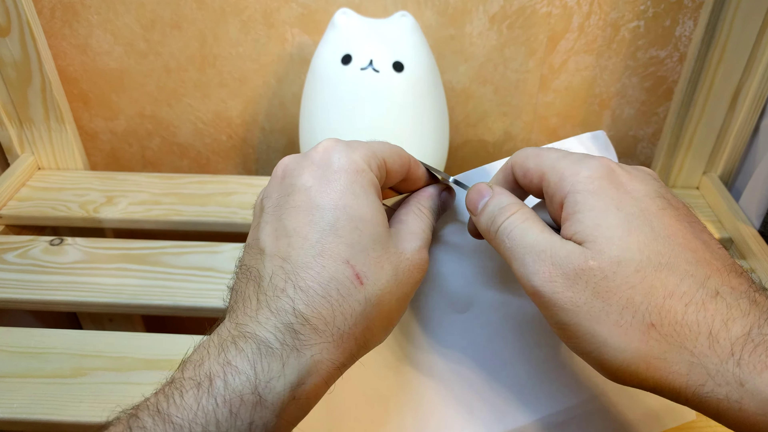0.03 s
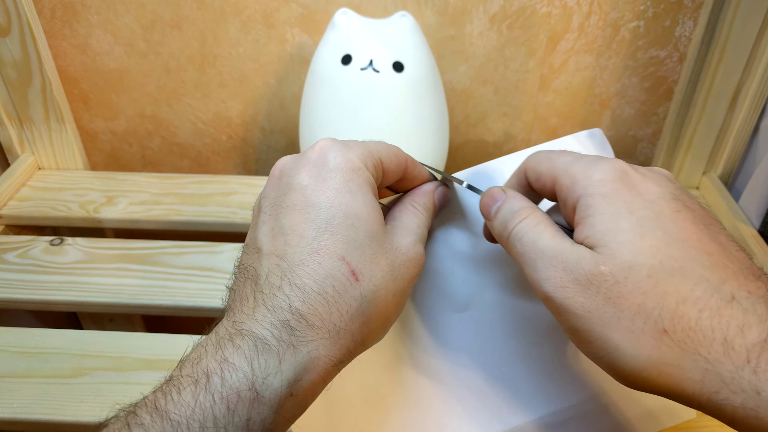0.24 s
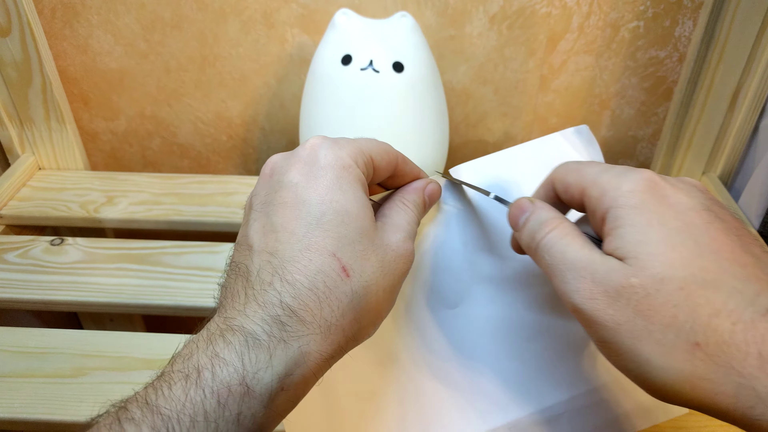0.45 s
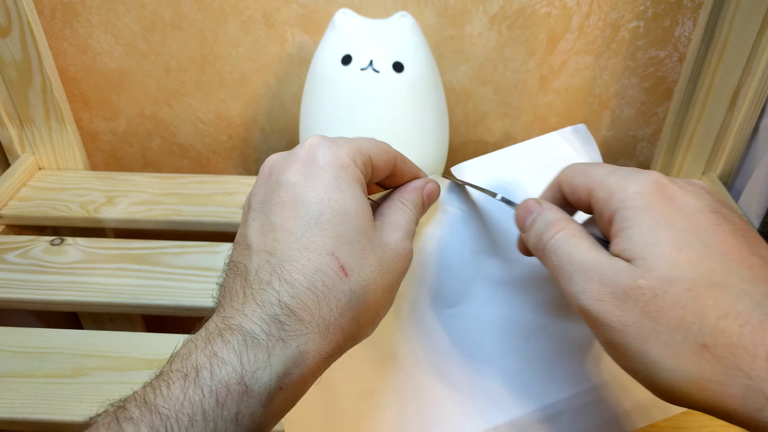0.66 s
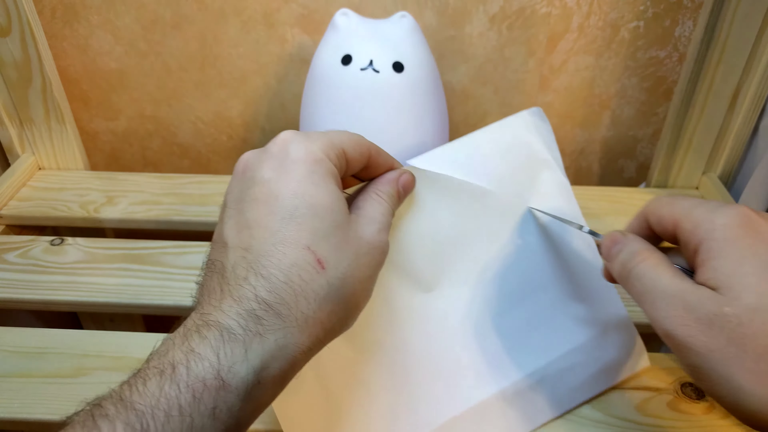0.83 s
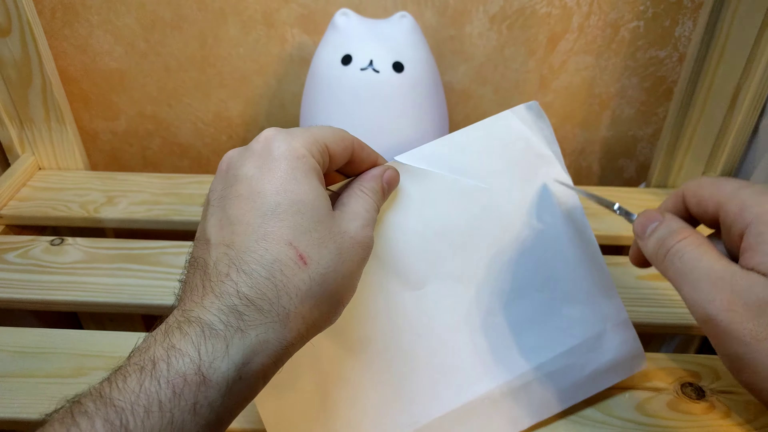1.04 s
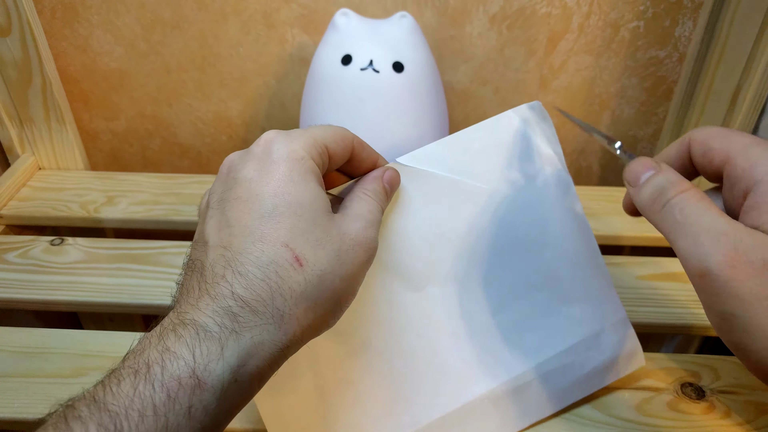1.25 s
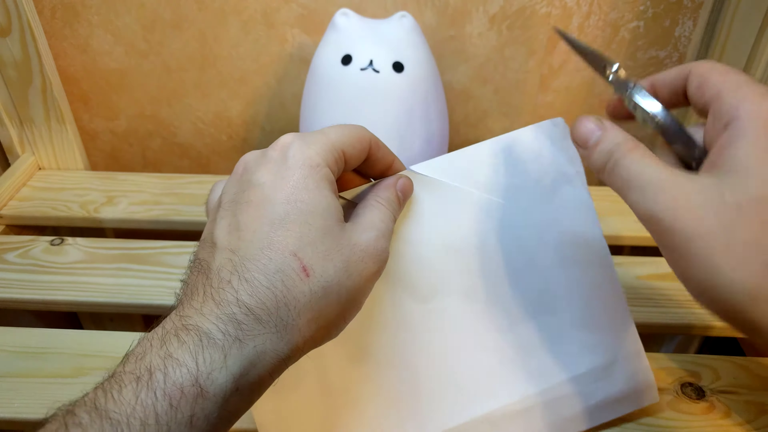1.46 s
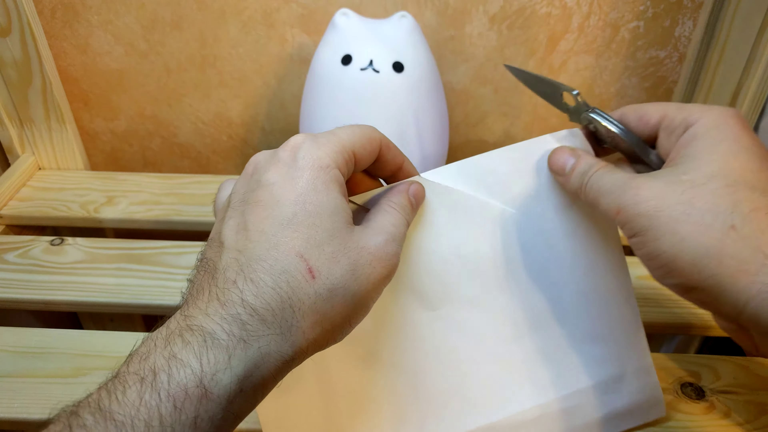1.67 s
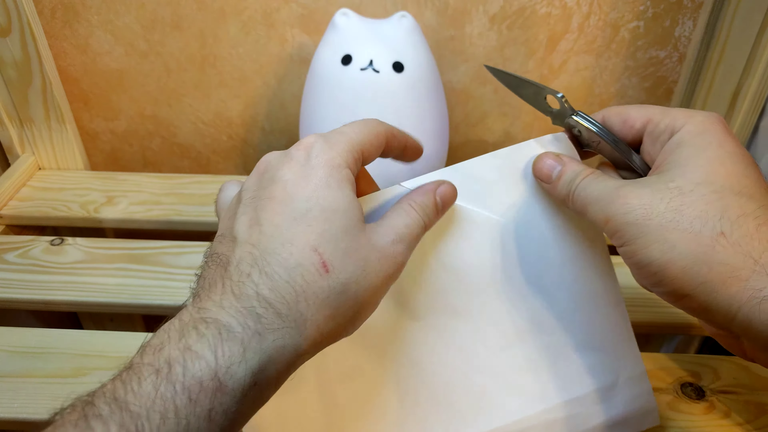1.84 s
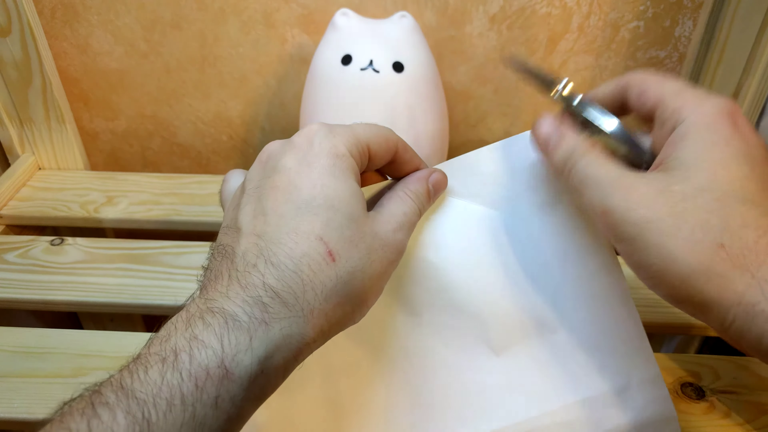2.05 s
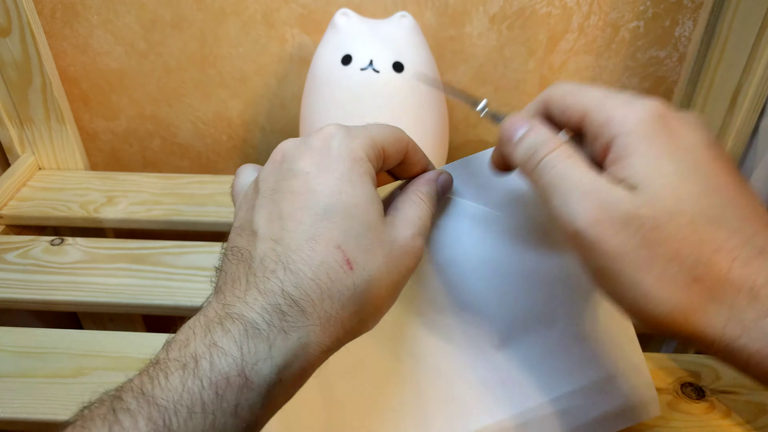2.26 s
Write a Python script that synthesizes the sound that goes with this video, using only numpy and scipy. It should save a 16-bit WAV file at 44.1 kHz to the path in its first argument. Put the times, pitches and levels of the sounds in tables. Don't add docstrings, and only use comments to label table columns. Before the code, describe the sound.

A knife slices hand-held paper, close to a small, bright microphone in a quiet room. Faint finger rub, then dry ticks from 0.07 to 0.28 s. A crisp rasp grows from about 0.2 s, strongest near 0.7-0.85 s, with thin whistles and squeals; the blade drags out softly until 1.1 s. Near silence, then light rubbing from 1.4 s and crinkles, snaps and knocks from 1.7 s, sharpest at 2.0 s, fading by 2.3 s.

```python
import sys
import numpy as np
from scipy import signal
from scipy.fft import rfft, irfft
from scipy.io import wavfile

SR = 44100
rng = np.random.default_rng(int(sys.argv[2]) if len(sys.argv) > 2 else 0)


def store_pcm(level_fs):
    pcm = np.round(np.clip(level_fs, -1, 1) * 32767).astype(np.int16)
    wavfile.write(sys.argv[1], SR, np.atleast_2d(pcm).T)


def attenuation_scalar(level_db):
    decades = np.asarray(level_db, float) / 20
    return 10 ** decades


N = 101429


def rms_one(x):
    return x / np.sqrt(np.mean(x ** 2) + 1e-20)


def in_time(rows, fade_s=0.0019):
    s, db, *rest = np.transpose(rows)
    t = np.arange(N) / SR
    gate = np.clip(np.minimum(t - s[0], s[-1] - t) / fade_s + 1, 0, 1)
    return [gate * attenuation_scalar(np.interp(t, s, db))] + [np.interp(t, s, column) for column in rest]


def at_hz(points, hz):
    point_hz, db = np.transpose(points)
    return np.interp(np.log(hz), np.log(point_hz), db)


def drift(rate_hz):
    r = np.exp(-80 * np.pi * rate_hz / SR)
    slow = signal.lfilter([1], [1, -2 * r, r * r], rng.standard_normal(N // 40 + 502))[500:]
    return np.interp(np.arange(N) / 40, np.arange(len(slow)), rms_one(slow))


def burst(s, peak_db, rise_s, t60_s):
    peak_over_rms_db = 12.5
    t = np.maximum(np.arange(N) / SR - s, 0)
    fall_db = 60 * np.maximum(t - rise_s, 0) / max(t60_s, .005)
    return attenuation_scalar(peak_db - peak_over_rms_db - np.minimum(fall_db, 200)) * np.minimum(t / rise_s, 1)


def ringing(hz, t60_s):
    r, w = attenuation_scalar(-60 / (t60_s * SR)), 2 * np.pi * hz / SR
    return np.sin(w), [1, -2 * r * np.cos(w), r * r], r


def shape(x, bumps):
    for hz, width_hz, share in bumps:
        x = x + max(share, -1) * signal.lfilter(*signal.iirpeak(hz, hz / width_hz, fs=SR), x)
    return x


def floor():
    # (frequency [Hz], level [dB])
    hiss_colour = [(21, -55), (35, -2.5), (263, -15.5), (450, -16.5), (1050, -27.5), (2250, -28),
                   (2490, -34), (7870, -32.5), (15700, -41.5)]
    hiss_db, rumble_db, rumble_hz = -67.5, -73, 52.5
    hz = np.maximum(np.fft.rfftfreq(N + 1, 1 / SR), 10)
    spectrum = rfft(rng.standard_normal(N + 1)) * attenuation_scalar(at_hz(hiss_colour, hz))
    hiss = rms_one(irfft(spectrum, N + 1)[:N])
    edges_hz = [rumble_hz * 0.785, rumble_hz * 1.01]
    band = signal.butter(2, edges_hz, "band", fs=SR, output="sos")
    rumble = rms_one(signal.sosfilt(band, rng.standard_normal(N)))
    return attenuation_scalar(hiss_db) * hiss + attenuation_scalar(rumble_db) * rumble


def rubs():
    # (time [s], level [dB], body [dB per octave below the pivot])
    slides = [
        [(0, -69.5, 6.5), (0.04, -72, 4.5), (0.07, -78, -1)],
        [(1.226, -77.5, 7.5), (1.3, -74.5, -10), (1.375, -73, 4), (1.4, -64, 5.5), (1.455, -57.5, 3),
         (1.49, -56, 0.5), (1.525, -76.5, 3.5), (1.575, -68.5, 3), (1.62, -75.5, -2), (1.7, -67, 4)],
        [(1.705, -59.5, 5), (1.76, -63.5, 3.5), (1.79, -62, -8), (1.882, -57, 3), (1.946, -65.5, 5),
         (2.056, -62, 4), (2.196, -62, 1), (2.3, -73.5, 3.5)],
    ]
    return [[gain, np.full(N, 0.061), body] for gain, body in map(in_time, slides)]


def nicks():
    # (time [s], peak [dB], length [s], rise [s])
    ticks = [(0.074, -45, 0.029, 0.0014), (0.079, -47.5, 0.03, 0.002), (0.095, -39, 0.0092, 0.0073),
             (0.109, -44, 0.01, 0.003), (0.119, -36, 0.019, 0.002), (0.124, -35.5, 0.021, 0.0057),
             (0.162, -30.5, 0.044, 0.00064), (0.182, -38, 0.015, 0.0057), (0.191, -54, 0.017, 0.0026),
             (0.22, -38, 0.033, 0.002), (0.237, -32.5, 0.019, 0.0054), (0.274, -39, 0.0074, 0.002),
             (0.2782, -22, 0.0053, 0.001)]
    gain = sum(burst(s, db, max(rise_s, .0003), 3 * length_s) for s, db, length_s, rise_s in ticks)
    return [[gain, np.full(N, 0.61), np.full(N, 3.0)]]


def glide(width_hz, rows):
    s, hz, db = np.transpose(rows)
    gain, pitch_hz = in_time(np.transpose([s, db, hz]))
    band = rng.standard_normal((2, N))
    for order, cutoff_hz in [(1, width_hz / 2), (2, width_hz)]:
        band = signal.sosfilt(signal.butter(order, cutoff_hz, fs=SR, output="sos"), band)
    phase = 2 * np.pi * np.cumsum(pitch_hz) / SR
    flutter = attenuation_scalar(1.2 * drift(45.5))
    return gain * flutter * rms_one(band[0] * np.cos(phase) + band[1] * np.sin(phase))


def squeals():
    # (time [s], frequency [Hz], level [dB])
    resonances = [
        (1100, [(0.72, 4900, -68.5), (0.75, 4500, -49.5), (0.785, 3600, -39), (0.805, 2900, -44), (0.83, 2360, -37.5), (0.855, 2276, -55)]),
        (446, [(0.165, 2150, -61), (0.3, 2130, -54.5), (0.42, 2300, -44), (0.5, 2378, -55), (0.6, 2540, -53)]),
        (485, [(0.165, 1249, -54.5), (0.25, 1400, -52), (0.5, 1500, -51.5), (0.68, 1197, -48.5), (0.9, 1100, -56), (1.05, 1050, -76.5)]),
        (600, [(0.23, 6690, -63), (0.28, 6850, -43), (0.4, 6745, -58), (0.47, 6900, -55), (0.56, 7100, -66), (0.63, 7196, -36), (0.72, 6900, -38), (0.85, 6900, -54), (0.87, 6900, -64)]),
        (200, [(0.86, 8750, -53), (0.92, 8680, -56.5), (0.97, 8450, -64), (0.99, 8120, -62), (1.01, 8100, -51.5), (1.085, 8150, -58.5), (1.1, 8200, -80)]),
    ]
    return sum(glide(*resonance) for resonance in resonances)


def whistles():
    # (time [s], frequency [Hz], level [dB])
    tones = [ (120, [(0.235, 6650, -51), (0.29, 6580, -42), (0.36, 6600, -47.5), (0.42, 6650, -49),
             (0.47, 6820, -34.5), (0.52, 7000, -61)]), (120, [(0.235, 7120, -54), (0.28, 7130, -43),
             (0.36, 7050, -56), (0.45, 6980, -55), (0.5, 7100, -59)]), (200, [(0.23, 8050, -56),
             (0.3, 8050, -52), (0.4, 8030, -63), (0.46, 8050, -64)]), (150, [(0.17, 5730, -49.5),
             (0.28, 5770, -53), (0.35, 5780, -69), (0.46, 5800, -63), (0.55, 5830, -53)]),
             (100, [(0.62, 6400, -50), (0.69, 6530, -34), (0.74, 6430, -47), (0.78, 6500, -52)]),
             (150, [(0.6, 7320, -48), (0.65, 7400, -42), (0.72, 7660, -38.5), (0.76, 7460, -46),
             (0.85, 7500, -59)]), (120, [(0.66, 7000, -52), (0.75, 7000, -44), (0.79, 6880, -43),
             (0.835, 6920, -49), (0.855, 6850, -45)]), (149, [(0.62, 8800, -52), (0.7, 8830, -39),
             (0.75, 8770, -55), (0.85, 8870, -53)]), (120, [(0.86, 7200, -71), (0.93, 7170, -55),
             (0.97, 7150, -54), (1.02, 7150, -55), (1.09, 6950, -63)]), (150, [(0.86, 6130, -49),
             (0.95, 6200, -62), (0.98, 6230, -67), (1.06, 6640, -68), (1.09, 6480, -61)]),
             (60, [(0.86, 1097, -67), (0.9, 1120, -54), (0.925, 1114, -64), (0.947, 1107, -41.5),
             (0.97, 1100, -64.5)]), (30, [(0.975, 393, -71), (0.99, 400, -52.5), (1.01, 404, -61)]), ]
    return sum(glide(*tone) for tone in tones)


def stroke():
    # (time [s], level [dB], brightness [dB per octave above the pivot],
    # body [dB per octave below the pivot])
    strokes = [
        [(0.205, -60.5, 12, -7), (0.245, -46, 8, 3), (0.42, -40, 1, 2), (0.47, -35, -7.5, 0),
         (0.57, -38, 10.5, 2.7), (0.605, -37.5, 8.5, 1.9), (0.63, -37, 11.5, 2.5), (0.72, -33, 0, -0.5),
         (0.845, -34, -7, -3.5)],
        [(0.86, -41.5, 3, 5), (0.95, -48.5, 0, 7), (0.965, -53.5, 3, 8), (1.01, -47.5, 3, 6.5),
         (1.085, -47, -1.5, -2), (1.105, -98, 0, 17.5)],
    ]
    return [in_time(rows, fade_s=0.013) for rows in strokes]


def knocks():
    # (time [s], peak [dB], depth [dB per octave below 1 kHz])
    hits = [(0.858, -44.5, 2.5), (0.957, -57, 0), (1.563, -53, -0.5), (1.737, -55.5, 4), (1.804, -50.5, 3),
            (1.84, -45.5, 2), (1.846, -50, -2), (2.0009, -31, -5), (2.0068, -37, -0.5), (2.045, -46.5, 2),
            (2.161, -41.5, -1.5), (2.232, -58, 3)]
    # (frequency [Hz], level [dB], t60 [s])
    modes = [(133.4, -8, 0.12), (251, -6.5, 0.14), (389, 0.5, .045), (636.5, -11, 0.14), (882, -4.5, 0.073),
             (1020, 4.5, 0.033), (1352, 2.5, 0.024), (1500, -18, 0.02), (2230, -3, 0.032),
             (3400, -13, 0.035)]
    s, db, depth = np.transpose(hits)
    own_db = rng.normal(0, 1.5, (len(s), len(modes)))
    out = np.zeros(N)
    for k, (hz, level_db, t60_s) in enumerate(modes):
        tilt_db = np.clip(depth, -6, 8) * np.log2(1000 / hz)
        clicks = np.full(N, 1e-18)
        clicks[(s * SR).astype(int)] = attenuation_scalar(db + level_db - 10.0 + tilt_db + own_db[:, k]) * (-1) ** k
        weight, feedback, _ = ringing(hz, t60_s)
        out += signal.lfilter([0, weight], feedback, clicks)
    return signal.lfilter([.3], [1, -.7], out)


def snaps():
    # (time [s], peak [dB], body [dB per octave below the pivot], t60 [s], rise [s])
    creases = [(1.705, -44, 0, 0.049, 0.003), (1.7223, -36.5, 5, 0.018, 0.0019),
               (1.736, -45.5, 8, 0.041, 0.0046), (1.751, -49, 9.5, 0.089, 0.0013),
               (1.799, -49, 12, 0.067, 0.0013), (1.811, -46, 6, 0.02, 0.00078),
               (1.827, -51.5, 12.5, 0.02, 0.0022), (1.8306, -30.5, -2, 0.018, 0.0012),
               (1.8449, -27, 6, 0.02, 0.0015), (1.906, -45, 0, 0.008, 0.0013),
               (1.913, -37.5, -0.5, 0.03, 0.0034), (1.97, -46.5, 9.5, 0.033, 0.0021),
               (2.0, -26, 9, 0.058, 0.00092), (2.014, -36.5, 7, 0.055, 0.0017),
               (2.022, -32.5, 7.5, 0.02, 0.0015), (2.042, -54, 11.5, 0.045, 0.003),
               (2.081, -47, 7, 0.032, 0.003), (2.167, -37.5, -9, 0.02, 0.0031),
               (2.223, -51, 7, 0.03, 0.0027), (2.232, -40, -5, 0.015, 0.0017)]
    gains = np.array([burst(s, db, max(rise_s, .0003), t60_s) for s, db, _, t60_s, rise_s in creases])
    body = np.array(creases)[gains.argmax(axis=0), 2]
    return [[gains.sum(axis=0), np.full(N, -4), body]]


def sheet(layers, count=110):
    # (frequency [Hz], level [dB per Hz])
    colour = [(88, -27), (150, -49), (397, -26.5), (698, -21), (1130, -13), (4430, -9), (6800, 3),
              (7790, -7.5), (15700, -27)]
    pivot_hz, cracks_per_s, crack_spread_db, patchy_db = 6030, 6000, 3, 3
    ring_cycles, ring_min_s = 50, .012
    out, norm = np.zeros(N), 0
    flutter = attenuation_scalar(1.18 * drift(118))
    pitches = np.linspace(12, 126.3, count) ** 2 * rng.uniform(.97, 1.03, count)
    cracks = []
    for _ in range(4):
        size = attenuation_scalar(crack_spread_db * np.minimum(rng.exponential(1, N), 4))
        sign = rng.choice([-1, 1], N)
        cracks.append(rms_one(size * sign * (rng.random(N) < cracks_per_s / SR)))
    patches = [drift(16.2)[::8] for _ in range(22)]
    layers = [[column[::8] for column in layer] for layer in layers]
    for k, hz in enumerate(pitches):
        octaves = np.log2(hz / pivot_hz)
        above, below = max(octaves, 0), max(-octaves, 0)
        drive = sum(gain * attenuation_scalar(bright * above + body * below) for gain, bright, body in layers)
        patch = attenuation_scalar(patchy_db * (patches[k // 5] + patches[(7 * k) % 22]) / 2)
        drive = np.repeat(drive * patch, 8)[:N]
        t60_s = min(ring_cycles / hz, ring_min_s * 3) + ring_min_s / 2
        weight, feedback, r = ringing(hz, t60_s)
        power = attenuation_scalar(at_hz(colour, hz)) ** 2 * np.sqrt(hz)
        norm += power
        level = (-1) ** (k // 4) * np.sqrt(power * 2 * (1 - r * r))
        own_cracks = np.roll(cracks[k % 4], 977 * (k // 4))
        out += level * signal.lfilter([weight], feedback, own_cracks * drive * flutter + 1e-18)
    low_cut = signal.butter(2, 187, "high", fs=SR, output="sos")
    return signal.sosfilt(low_cut, out / np.sqrt(norm))


def surroundings(x):
    # (frequency [Hz], width [Hz], share)
    shelf_dips = [(657, 540, -0.71), (1800, 506, -0.69), (2847, 500, -0.35), (7650, 220, -0.31),
                  (9460, 580, -0.19)]
    room_db, room_t60_s = -14, 0.23
    t = np.arange(SR // 3) / SR
    tail = rng.standard_normal(len(t)) * attenuation_scalar(-60 * t / room_t60_s) * (t > .004)
    room = signal.fftconvolve(x, tail / np.linalg.norm(tail))[:N]
    return shape(x + attenuation_scalar(room_db) * room, shelf_dips)


def scene():
    paper = sheet(rubs() + nicks() + stroke() + snaps())
    return (surroundings(paper + squeals() + whistles()) + knocks() + floor())[None]


def roll_off(x):
    return signal.sosfilt(signal.butter(12, 15840, fs=SR, output="sos"), x)


def record(dry):
    # (frequency [Hz], width [Hz], share)
    mic_peaks = [(7700, 510, 0.5), (9870, 270, 0.24), (12260, 200, 0.36), (5360, 98, 0.15),
                 (4030, 270, 0.16)]
    # (time [s], level [dB])
    noise_gate = [
        (0, 2.5),
        (0.045, -3),
        (0.07, -10),
        (0.078, -2),
        (1.17, 0),
        (1.22, -12),
        (1.226, -0.16),
        (2.3, 4),
    ]
    low_cut = signal.butter(4, 44, "high", fs=SR, output="sos")
    x = shape(signal.sosfilt(low_cut, dry), mic_peaks)
    return roll_off(x * in_time(noise_gate)[0] - .0009)


dry = scene()
out = record(dry)
store_pcm(out)
```